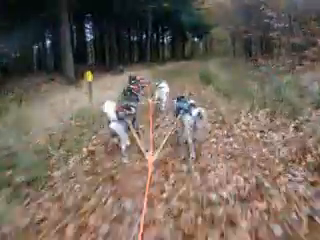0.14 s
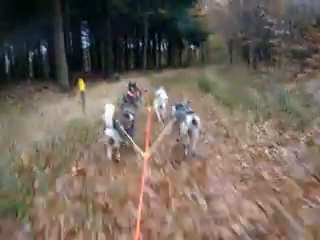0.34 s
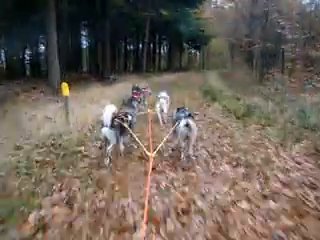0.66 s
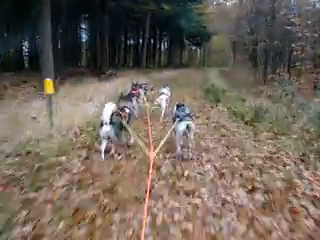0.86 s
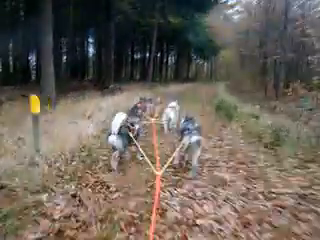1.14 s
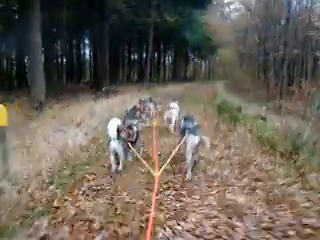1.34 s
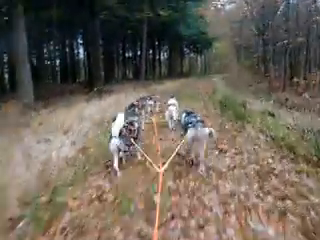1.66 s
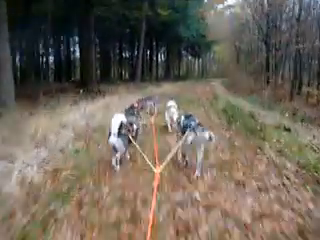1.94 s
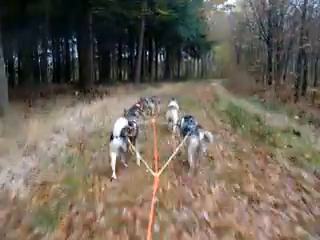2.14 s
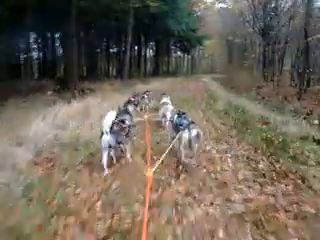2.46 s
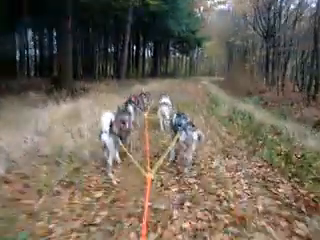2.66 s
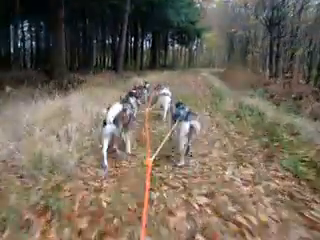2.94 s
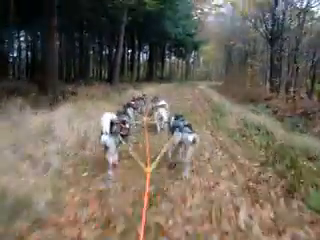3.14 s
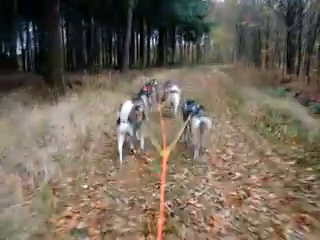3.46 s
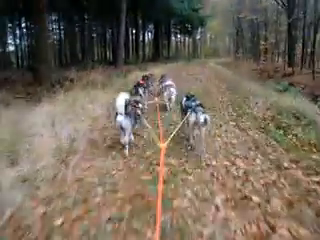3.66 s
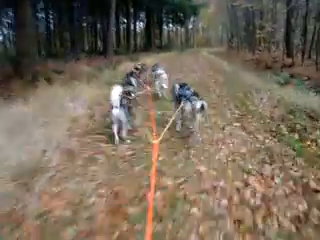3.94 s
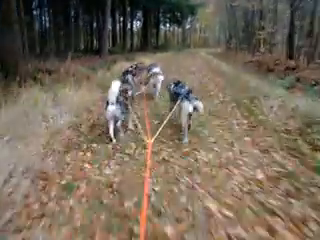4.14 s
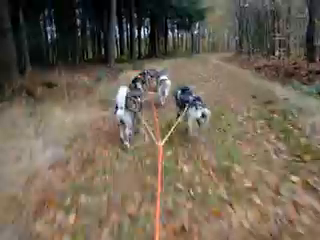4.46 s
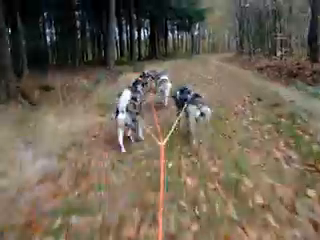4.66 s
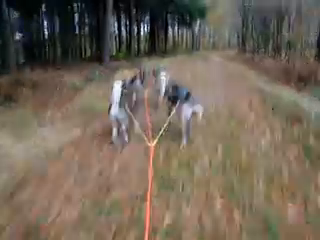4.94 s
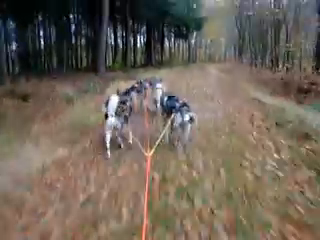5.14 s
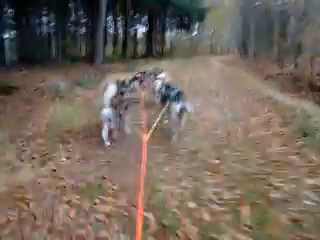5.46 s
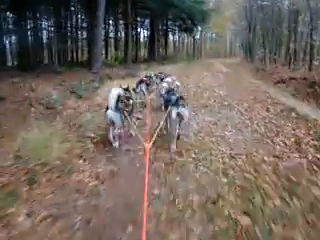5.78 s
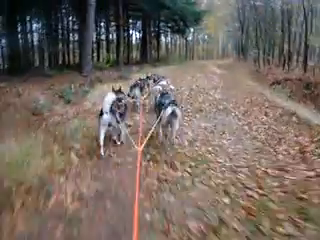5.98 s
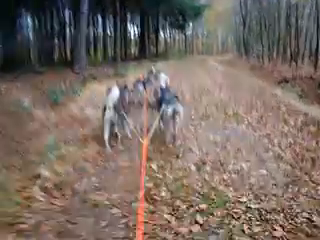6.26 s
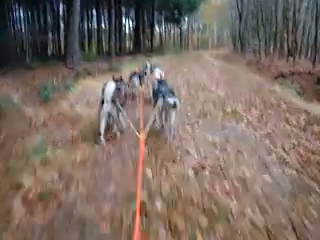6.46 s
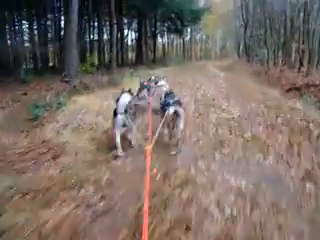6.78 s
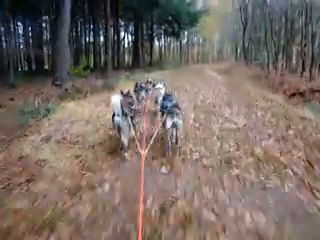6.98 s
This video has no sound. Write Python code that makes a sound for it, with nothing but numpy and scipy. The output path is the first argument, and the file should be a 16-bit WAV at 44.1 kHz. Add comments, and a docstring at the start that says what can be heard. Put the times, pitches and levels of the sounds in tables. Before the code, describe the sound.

A fast cart rolls outdoors over leaf litter, heard from a small microphone fixed on it. Gusts buffet low and unevenly, tyres scrape gritty soil, and a steady papery rustle fills the foreground, pricked by brittle twig cracks and short wooden knocks. Past four seconds the wind and grinding ease, leaving lighter crunching in small bursts, individual snaps and a faint even hiss. Dry, close, muffled treble, no echo.

```python
"""On a cart behind a dog team, on a forest track of dry leaves, with a small microphone on board.
At first the cart runs fast: air buffets the microphone in gusts and the tyres grind the soil below.
All along, close by, leaves crush in clusters of tiny cracks, twigs snap and the cart knocks in the ruts;
a faint, even high hiss lies under the rustle.
After about four seconds the cart slows, so wind and grinding ease and the leaves thin out."""
import sys
import numpy as np
from scipy import signal
from scipy.fft import rfft, irfft, next_fast_len
from scipy.io import wavfile

SR = 44100
rng = np.random.default_rng(int(sys.argv[2]) if len(sys.argv) > 2 else 0)


def wav_out(sig):
    """Save sig, one row per channel (or a flat mono array), as 16-bit PCM at SR to the path in sys.argv[1]."""
    wavfile.write(sys.argv[1], SR, np.round(np.clip(np.atleast_2d(sig).T, -1, 1) * 32767).astype(np.int16))


N = 313551  # length in samples

# All levels are those at the microphone, ahead of the recorder's response.

# Pace of the cart. Each row: time in seconds, speed in dB relative to the reference speed.
SPEED = [(0.0, 0.5), (1.5, -0.74), (3.7, 0), (4.2, -1), (4.55, -4), (5.4, -3.5), (7.11, -4.5)]
# Level at the reference speed [dB], and dB gained per dB of speed.
WIND_DB, WIND_PER_SPEED = -40, 3.8
SOIL_DB, SOIL_PER_SPEED = -37.5, 0.56

# Gusts on the microphone. Each row: centre in seconds, level in dB, half length in seconds.
GUSTS = [(0.01, -31, 0.018), (0.101, -26, 0.021), (0.193, -31.5, 0.038), (0.36, -32.5, 0.15),
         (0.52, -34, 0.034), (0.77, -39, 0.026), (1.043, -36.5, 0.095), (1.145, -34, 0.016),
         (1.276, -45.5, 0.081), (1.503, -35, 0.12), (1.854, -42, 0.022), (2.103, -38, 0.14),
         (2.425, -34.5, 0.054), (2.676, -42, 0.077), (2.98, -35, 0.046), (3.288, -46, 0.22),
         (3.70, -43, 0.1), (4.35, -41, 0.018), (4.52, -43, 0.015), (4.70, -39, 0.016), (4.815, -37.5, 0.06),
         (4.92, -47, 0.05), (5.277, -44, 0.027), (5.803, -48, 0.023), (5.905, -46, 0.036),
         (6.745, -54, 0.044)]
# Moments when the rumble of air and ground changes, mostly dropping away.
# Each row: centre in seconds, change in dB (negative is quieter), half length in seconds.
CALMS = [(0.68, -16, 0.04), (0.89, -8, 0.046), (2.30, -13, 0.048), (2.79, -9, 0.035), (3.47, -5, 0.041),
         (3.98, -13, 0.029), (4.59, 1, 0.04), (6.45, -4, 0.16)]
# Spectrum of the wind rumble. Each row: frequency in Hz, gain in dB.
WIND_COLOUR = [(20, -33), (35, -28), (60, -15), (110, -3.5), (170, -1.5), (250, -3), (400, -8.5),
               (700, -20), (2000, -48)]

# Tyres scuffing over bumps. Each row: centre in seconds, level in dB, half length in seconds.
SCUFFS = [(0.097, -31.5, 0.017), (0.18, -34, .02), (0.272, -38, 0.015), (0.406, -36, 0.073),
          (1.08, -36, 0.031), (1.27, -30.5, 0.032), (1.494, -36, .02), (1.63, -41, 0.021),
          (2.274, -30, 0.013), (2.447, -33, 0.019), (2.652, -36, 0.029), (2.849, -29, 0.014),
          (3.382, -31, 0.051), (3.787, -28, 0.0097), (4.033, -32.5, 0.055), (4.175, -27.5, 0.033),
          (4.356, -36, 0.02), (4.435, -32.5, 0.012), (5.585, -29, 0.027), (5.812, -34, 0.029),
          (5.916, -36, 0.025), (6.308, -37.5, 0.072), (6.798, -36, 0.02), (7.006, -35.5, 0.038)]
# Spectrum of the ground soil. Each row: frequency in Hz, gain in dB.
SOIL_COLOUR = [(40, -35), (130, -24.5), (280, -6.5), (500, -2.5), (900, -1), (1400, -7), (2500, -7.5),
               (6000, -42)]

# Dull knocks of the cart jolting.
# Each row: start in seconds, peak of the first contact in dB, pitch in Hz, rattling time in seconds.
JOLTS = [(0.095, -21, 340, 0.013), (0.106, -16, 225, 0.0065), (0.165, -20, 225, 0.035),
         (0.199, -16.5, 215, 0.011), (0.267, -17.5, 255, 0.035), (0.304, -23, 260, .015),
         (0.375, -29, 260, .05), (1.479, -14, 520, 0.002), (1.844, -26, 216, 0.024),
         (2.442, -19, 370, 0.011), (2.455, -21, 250, 0.014), (2.718, -26, 260, .005),
         (2.938, -23, 210, 0.025), (3.664, -26, 270, 0.025), (3.778, -28, 420, 0.013),
         (4.082, -17, 900, 0.0028), (4.166, -18.5, 900, .001), (4.182, -23, 620, .002),
         (4.189, -19, 450, .003), (4.195, -28, 260, .03), (4.237, -25, 520, .006), (4.355, -27, 600, .004),
         (4.519, -27, 620, .003), (4.685, -32, 230, .012), (4.795, -27, 260, 0.035),
         (5.135, -32, 175, .018), (5.575, -20.5, 800, .007), (5.599, -19, 750, .002),
         (6.323, -28, 720, .003), (6.7, -33, 290, .02), (6.7817, -17, 500, 0.0008)]

# Twigs, stalks and stiff leaves breaking.
# Each row: start in seconds, peak of the first crack in dB, pitch in Hz, width as a share of the pitch,
# splintering time in seconds, splinter strength 0-1, fine fibres in dB relative to the crack.
TWIGS = [(0.329, -11, 2900, .6, .001, .22, -6), (0.3375, -15, 3000, .7, .001, .22, -6),
         (0.3967, -5.5, 1400, 1.5, .001, .12, -6), (0.4695, -8, 1450, 1.2, .001, .15, -6),
         (0.6671, -13, 3200, .5, .001, .3, -1), (0.7412, -14, 3200, .5, .001, .3, -1),
         (0.7831, -6, 2750, .32, .0012, .2, -4), (0.7855, -19.5, 2950, .12, .007, .5, -8),
         (0.9596, -12.5, 2700, .6, .0018, .3, -5), (1.075, -14, 3200, .45, .001, .3, -7),
         (1.1535, -14, 2900, .7, .001, .22, -6), (1.475, -15, 3000, .5, .001, .25, 0),
         (1.7031, -16, 3200, .45, .001, .3, -2), (1.7947, -12.5, 3100, .5, .001, .3, -2),
         (2.267, -14.5, 2500, .6, .001, .3, -2), (2.36, -15, 3200, .45, .0015, .35, -1),
         (2.424, -13, 1750, .3, .002, .45, -14), (2.8559, -16, 3500, .4, .0012, .35, 0),
         (3.0174, -14.5, 3200, .4, .001, .3, -7), (3.0274, -12, 3100, .55, .001, .25, -2),
         (3.2798, -16, 2800, .45, .0012, .35, -4), (3.5427, -17, 3700, .3, .0015, .35, -1),
         (3.5489, -15, 3300, .4, .001, .3, -4), (3.637, -14, 2600, .8, .001, .22, -6),
         (3.8036, -14, 2600, .8, .001, .22, -6), (3.8246, -15, 3200, .45, .001, .3, -3),
         (3.9362, -15, 3000, .4, .0012, .35, -6), (4.0478, -11, 3000, .6, .002, .25, -6),
         (4.158, -21, 1600, .9, .02, .35, -12), (4.235, -19, 3200, .45, .006, .3, -3),
         (4.2617, -16, 3300, .4, .0015, .35, -3), (4.269, -15, 3000, .45, .001, .3, -5),
         (4.342, -16, 3400, .5, .008, .25, -4), (4.3523, -18, 3100, .4, .0015, .35, -3),
         (4.7999, -16, 3000, .45, .001, .3, -5), (4.8913, -13, 3300, .5, .001, .22, -6),
         (5.0684, -13, 2200, 1.0, .0035, .33, -6), (5.0847, -16, 2900, .6, .002, .3, -6),
         (5.2182, -11.5, 3550, .3, .003, .26, -2), (5.265, -14.5, 3100, .45, .001, .25, -4),
         (5.4177, -16.5, 3300, .2, .0028, .42, 0), (5.4213, -11, 3600, .19, .0012, .2, 1),
         (5.4235, -21, 3650, .28, .003, .55, 1), (5.6424, -12.5, 3450, .3, .0017, .35, -2),
         (5.6455, -21, 3700, .3, .006, .5, -1), (5.655, -16, 3700, .2, .004, .42, 0),
         (5.6926, -14.5, 3000, .5, .001, .3, -2), (5.7369, -19, 3200, .45, .0008, .3, -1),
         (5.8025, -18, 3200, .5, .005, .35, -4), (5.8213, -15, 3700, .35, .002, .35, -4),
         (6.0495, -14, 2800, .8, .001, .22, -6), (6.2355, -16, 3100, .45, .003, .4, -4),
         (6.2372, -11.5, 2900, .45, .006, .3, -7), (6.4496, -18, 3500, .35, .002, .4, -5),
         (6.6384, -20, 3200, .45, .003, .25, -3), (6.7297, -18.5, 3100, .4, .0012, .35, -3),
         (6.9085, -18, 3200, .45, .002, .22, -6), (6.918, -13, 2940, .45, .0052, .27, -6),
         (7.047, -22, 3200, .45, .003, .25, -6)]

# Thickness of the leaf carpet, as its steady rustle. Each row: time in seconds, level in dB.
CARPET = [(0.0, -27.5), (0.25, -29), (0.6, -28), (0.87, -29), (1.35, -27.5), (2.0, -28.5), (3.2, -29.5),
          (4.0, -30), (5.0, -30.5), (5.75, -30.5), (5.98, -31), (6.35, -29), (6.55, -32), (6.76, -32),
          (6.87, -35.5), (7.0, -31.5), (7.11, -33.5)]
# Paws and wheels plough through heaps of leaves.
# Each row: centre in seconds, level in dB, half length in seconds.
HEAPS = [(1.325, -31, 0.036), (1.63, -32.5, 0.031), (2.18, -32, 0.017), (2.414, -33, 0.033),
         (2.638, -33.5, 0.019), (2.868, -34.5, 0.033), (3.006, -34.5, 0.067), (3.288, -32.5, 0.013),
         (3.387, -29, 0.0095), (3.556, -36.5, 0.047), (3.813, -32, 0.011), (3.933, -34, 0.024),
         (4.044, -30.5, 0.042), (4.17, -39, 0.0077), (4.479, -34.5, 0.014), (4.625, -32.5, 0.016),
         (4.695, -28, 0.0045), (4.785, -32.5, 0.024), (4.881, -30.5, 0.027), (5.08, -41, 0.061),
         (5.172, -39.5, 0.024), (5.282, -34, 0.038), (5.578, -31.5, 0.082), (5.692, -31.5, 0.025),
         (5.818, -32.5, 0.04), (5.901, -29.5, 0.041), (6.088, -31.5, 0.069), (6.189, -32.5, 0.029),
         (6.251, -32, 0.018), (6.312, -30, 0.031), (6.64, -29, 0.0063), (6.733, -32.5, 0.025),
         (6.94, -29.5, 0.037), (7.106, -31, 0.018)]
# Moments when the rustle dips briefly. Each row: centre in seconds, change in dB, half length in seconds.
LULLS = [(0.776, -3, 0.0054), (4.246, -16, 0.0024), (5.099, -7, 0.008), (5.23, -17, 0.0035),
         (5.398, -21, 0.0046), (5.638, -7, .003)]
# Spectrum of the rustle. Each row: frequency in Hz, gain in dB.
LEAF_COLOUR = [(150, -13), (500, -13), (1000, -4.5), (1500, -2.5), (2300, -2), (3100, 0.5), (4400, -1.5),
               (13000, -3)]
# Limits of the rustle's flickering upper edge, low and high in Hz.
EDGE_HZ = (4050, 5000)

# The small recorder is dull above its speech band. Each row: frequency in Hz, gain in dB.
RESPONSE = [(20, 0), (4480, 0), (4620, -13), (4720, -35), (5150, -37), (5400, -30), (6200, -32),
            (7450, -25), (7650, -17), (8800, -17), (10200, -23), (12600, -24)]
CUTOFF_HZ = 12650  # the recorder's upper limit


def from_db(db):
    """Decibels to gain."""
    return 10 ** (np.asarray(db) / 20)


def rms_one(x):
    """Scale to unit power."""
    return x / np.sqrt(np.mean(x ** 2) + 1e-20)


def level(rows):
    """Gain at every sample from rows of time and dB."""
    return from_db(np.interp(np.arange(N) / SR, *np.transpose(rows)))


def drift(rate):
    """Smooth chance with spread 1 that changes about rate times a second."""
    step = 20  # samples from one slow value to the next
    settle = 4000  # slow values dropped while the filter settles
    pole = np.exp(-2 * step * np.pi * rate / SR)
    noise = rng.standard_normal(N // step + settle + 2)
    slow = signal.lfilter([1], [1, -2 * pole, pole * pole], noise)[settle:]
    return np.interp(np.arange(N) / step, np.arange(len(slow)), rms_one(slow))


def colour(x, points):
    """Filter by a table of Hz and dB, read along a logarithmic frequency axis."""
    hz, db = np.transpose(points)
    size = next_fast_len(N + SR // 10)
    bins_hz = np.maximum(np.arange(size // 2 + 1) * SR / size, 1)
    gain = from_db(np.interp(np.log(bins_hz), np.log(hz), db))
    return irfft(rfft(x, size) * gain, size)[:N]


def band(x, low_hz, high_hz, order=2):
    """Causal band-pass."""
    limits = [low_hz, min(high_hz, SR / 2 - 1000)]
    sos = signal.butter(order, limits, "band", fs=SR, output="sos")
    return signal.sosfilt(sos, x + 1e-18)  # the tiny offset is inaudible


def cracks(per_s, spread_db):
    """Clicks at random moments, most small and a few large."""
    sizes = from_db(spread_db * np.minimum(rng.exponential(1, N), 4))
    happens = rng.random(N) < per_s / SR
    return happens * sizes * rng.choice([-1, 1], N)


def blow(hz, width, length, rough, contacts_per_s=2500):
    """One sharp contact and a dying run of smaller ones into a damped resonance; first peak 1."""
    t = np.arange(SR // 4) / SR
    low_hz, high_hz = hz / (1 + width), hz * (1 + width)
    first = band(1.0 * (t == 0), low_hz, high_hz)
    contacts = (rng.random(len(t)) < contacts_per_s / SR) * rng.choice([-1, 1], len(t))
    after = rms_one(band(contacts, low_hz, high_hz))
    return first / np.abs(first).max() + rough * after * np.exp(-(t / length) ** 2)


def add(track, s, sound):
    """Mix a short sound in at a moment."""
    start = int(s * SR)
    track[start:start + len(sound)] += sound[:N - start]


def swells(steady, rows):
    """A steady gain with bell-shaped swells on top; their powers sum."""
    t = np.arange(N) / SR
    power = steady ** 2
    for s, db, length in rows:
        near = np.abs(t - s) < 3 * length
        bell = np.exp(-((t[near] - s) / length) ** 2)
        power[near] += (from_db(db) * bell) ** 2
    return np.sqrt(power)


def dips(rows):
    """A gain of 1 with bell-shaped changes in dB."""
    t = np.arange(N) / SR
    return from_db(sum(db * np.exp(-((t - s) / length) ** 2) for s, db, length in rows))


def hiss(hiss_db=-35):
    """A faint, even high hiss under the rustle: steady noise in a high band."""
    return from_db(hiss_db) * rms_one(band(rng.standard_normal(N), 7700, 18600))


def wind(eddy_db=0.05):
    """Eddies at the microphone port give a lumpy rumble that grows steeply with speed and comes in gusts."""
    eddies = rng.standard_normal(N) * from_db(eddy_db * drift(31))
    steady = from_db(WIND_DB) * level(SPEED) ** WIND_PER_SPEED
    airflow = dips(CALMS) * swells(steady, GUSTS)
    return airflow * rms_one(colour(eddies, WIND_COLOUR))


def soil(lump_db=0.0, calm_share=0.25):
    """Grit and damp litter grind under the tyres, harder at speed and on each bump."""
    grit = cracks(3000, spread_db=0.5) * from_db(lump_db * drift(46))
    steady = from_db(SOIL_DB) * level(SPEED) ** SOIL_PER_SPEED
    pressure = dips(CALMS) ** calm_share * swells(steady, SCUFFS)
    return pressure * rms_one(colour(grit, SOIL_COLOUR))


def jolts(hard_s=0.0036):
    """Ruts shake the cart into heavily damped knocks; the briefest are hard contacts with a wider spectrum."""
    out = np.zeros(N)
    for s, db, hz, length in JOLTS:
        width = 0.39 + 0.72 * np.exp(-length / hard_s)
        add(out, s, from_db(db) * blow(hz, width, length, rough=0.31))
    return out


def twigs(splinter_hz=9000):
    """A twig breaks with one crack and a short run of splinters, the finest of them far up in the treble."""
    out = np.zeros(N)
    for s, db, hz, width, length, splinters, fibres_db in TWIGS:
        wood = blow(hz, width, length, rough=splinters)
        fibres = from_db(fibres_db) * blow(splinter_hz, width=0.41, length=length, rough=0.83)
        add(out, s, from_db(db) * (wood + fibres))
    return out


def crackle(per_s=22, spread_db=1.5, width=0.19):
    """Single leaves right under the tyres split with one ringing tick each; smaller leaves tick higher."""
    ticks = np.zeros(N)
    for hz in np.geomspace(1200, 4000, 8):
        splits = cracks(per_s, spread_db)
        # a higher band is wider and passes more of each click, so it is turned down
        ticks += band(splits, hz / (1 + width), hz * (1 + width)) / np.sqrt(hz)
    return rms_one(ticks)


def flickering_edge(rustle, flicker_db=7.0, per_s=90, edge_db=-2.5):
    """The bright upper edge of the rustle flickers in level, which coarsens its grain."""
    sos = signal.butter(3, EDGE_HZ, "band", fs=SR, output="sos")
    edge = signal.sosfiltfilt(sos, rustle)
    flicker = from_db(edge_db + flicker_db * np.tanh(drift(per_s)))
    return rustle + edge * (flicker - 1)


def leaves(clump_db=0.24, tread_db=0.5, patch_db=2.0, flake_db=2.0, bed_db=-3.0, crackle_db=-12.0):
    """Each crushed leaf gives a clump of cracks; leaves of different sizes speak in different bands."""
    loudness = swells(level(CARPET), HEAPS)
    crush = from_db(clump_db * drift(100) + tread_db * drift(37))
    per_s = 4000 * rms_one(loudness) ** 2  # a thicker carpet cracks more often
    papery = np.zeros(N)
    limits_hz = np.geomspace(400, 13000, 11)
    for low_hz, high_hz in zip(limits_hz, limits_hz[1:]):
        papery += band(cracks(per_s, spread_db=3.0), low_hz, high_hz) * from_db(patch_db * drift(50))
    # brittle edges flake off in short bright bursts
    bursts = cracks(per_s / 2, spread_db=1.5) * from_db(flake_db * drift(160))
    flakes = band(bursts, 3120, 17400)
    near = crush * (rms_one(papery) + from_db(-4.0) * rms_one(flakes) + from_db(crackle_db) * crackle())
    bed = from_db(bed_db) * rng.standard_normal(N)  # countless leaves sliding under paws and rear wheels
    rustle = colour(near + bed, LEAF_COLOUR)
    # the carpet and heap levels hold for the middle of the rustle's spectrum
    middle = np.std(band(rustle, 1500, 4500))
    return dips(LULLS) * loudness * flickering_edge(rustle) / middle


def scene():
    """Everything travels along with the cart."""
    return (hiss() + wind() + soil() + jolts() + twigs() + leaves())[None]


def record(dry):
    """The recorder dulls the treble and cuts the top."""
    top_cut = signal.ellip(12, .1, 90, CUTOFF_HZ, fs=SR, output="sos")
    return signal.sosfilt(top_cut, colour(dry[0], RESPONSE))[None]


dry = scene()
out = record(dry)
wav_out(out)
```